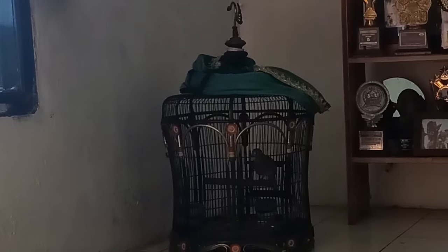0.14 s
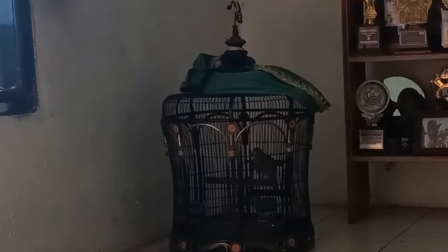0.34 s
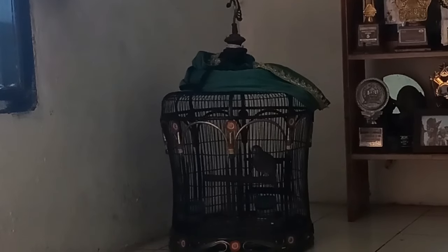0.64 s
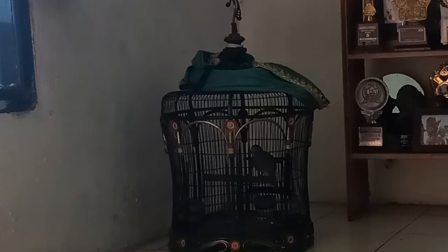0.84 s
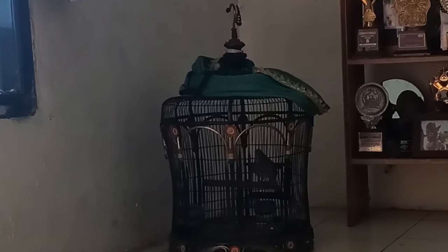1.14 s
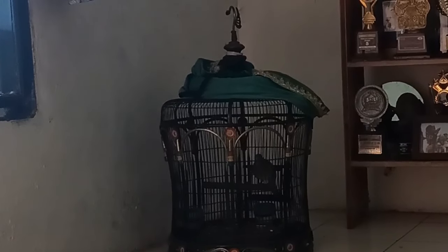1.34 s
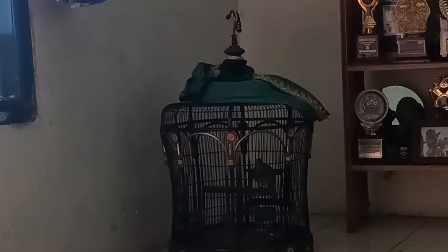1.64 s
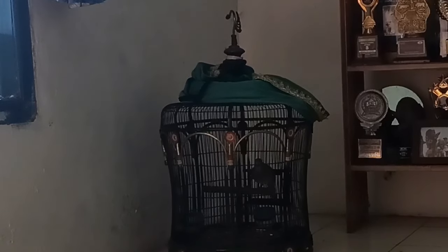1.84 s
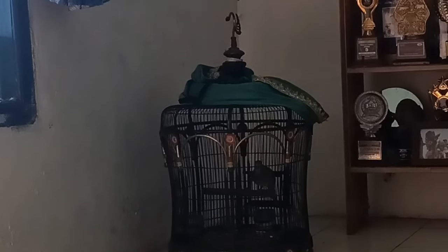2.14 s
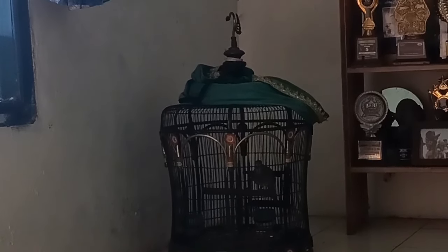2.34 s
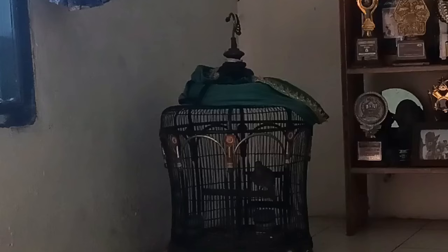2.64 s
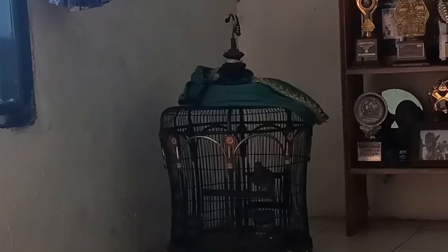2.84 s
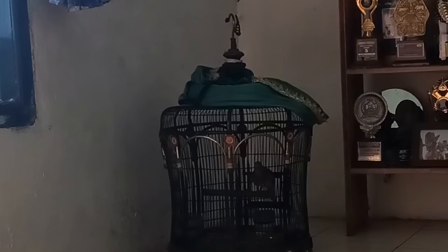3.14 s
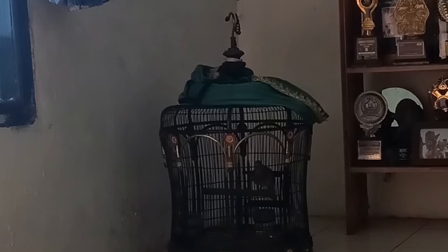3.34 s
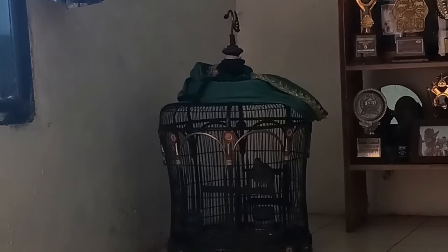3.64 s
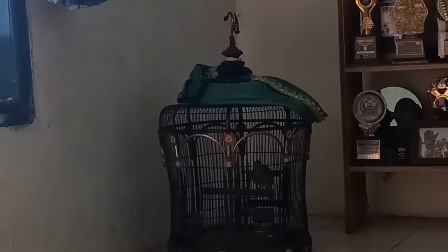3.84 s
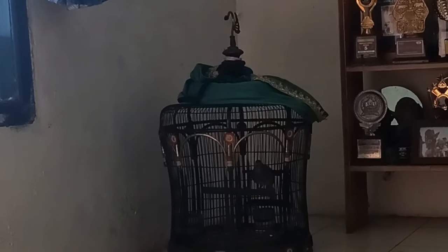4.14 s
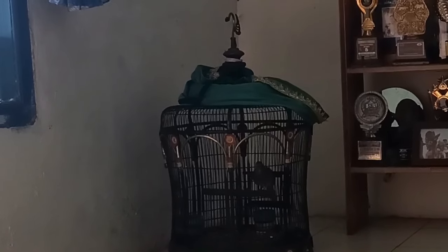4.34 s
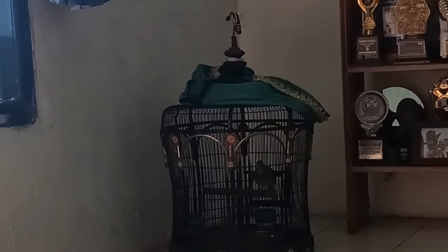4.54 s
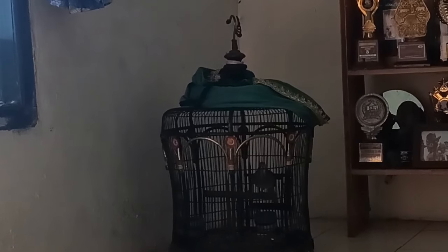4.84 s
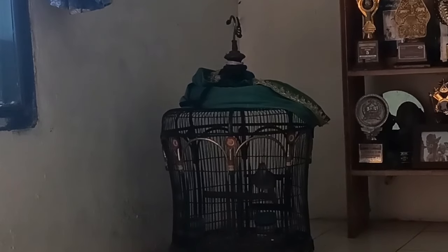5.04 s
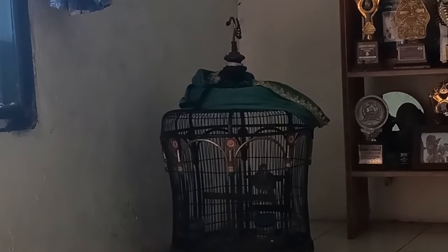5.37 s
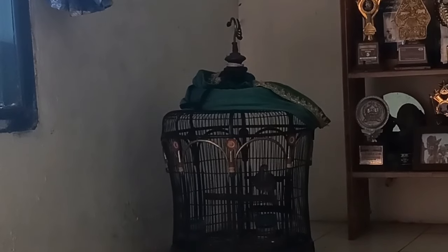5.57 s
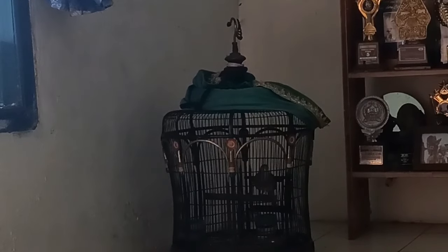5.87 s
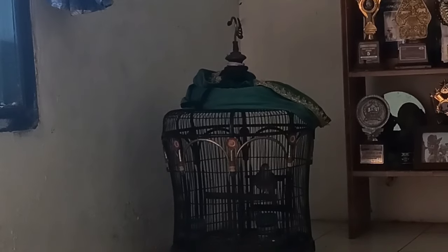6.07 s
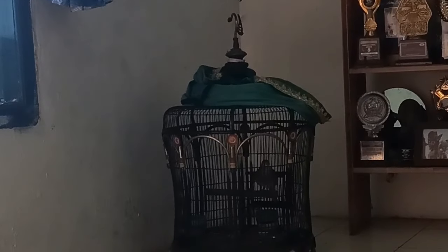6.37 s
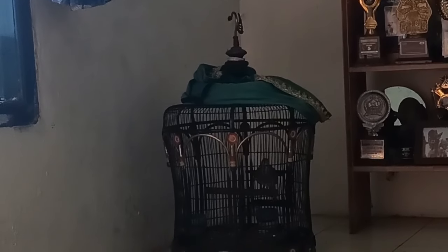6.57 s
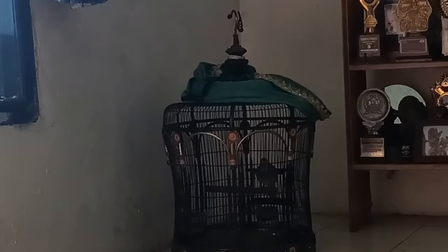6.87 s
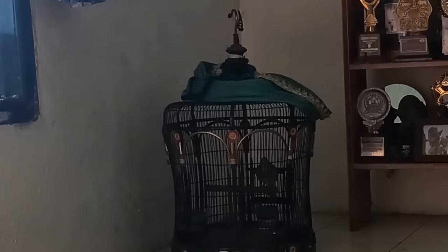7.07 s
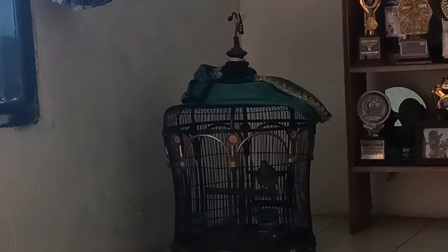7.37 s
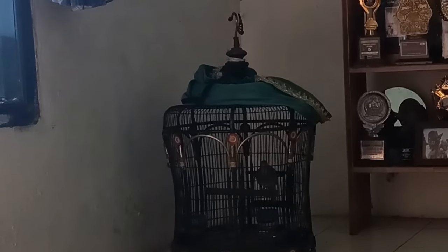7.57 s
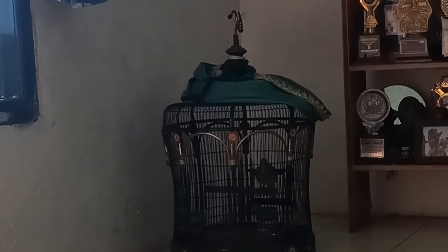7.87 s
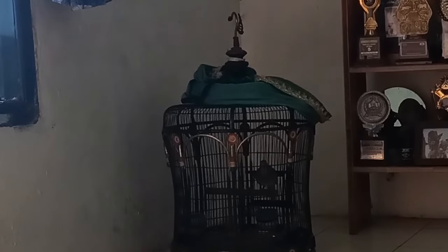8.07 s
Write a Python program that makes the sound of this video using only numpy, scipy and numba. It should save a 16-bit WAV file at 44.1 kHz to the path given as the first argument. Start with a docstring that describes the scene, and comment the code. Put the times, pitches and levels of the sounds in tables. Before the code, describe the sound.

A sharp hissing tick opens over low hum and soft room hiss. A caged dove close to the microphone gives a rolling coo of several quick notes, then repeats it twice after pauses. Faint small birds whistle downward behind it, small ticks scatter throughout, a metal dish scrapes once after the second coo, and a distant hoarse crowing drifts in before the third. Hard-walled room, stereo.

```python
"""A sharp, hissing high tick comes first, over a low hum and faint calls; then a near dove repeats a rolling coo.
The dove is gliding sine tones with throat pulses; small birds are warbled, mostly falling whistles, and the first,
low rising one is a faint far dove. Short ticks and rustles are decaying hiss around a narrow band.
A metal dish scrapes once (rubbed resonances) and a hoarse crowing drifts in (pulses and breath in a throat).
A hard room rings through delay lines. Levels in the tables are those before the final mix."""
import sys
import numpy as np
from scipy import signal
from scipy.fft import rfft, irfft, next_fast_len
from scipy.io import wavfile
from scipy.ndimage import uniform_filter1d
from numba import njit

SR = 44100
rng = np.random.default_rng(int(sys.argv[2]) if len(sys.argv) > 2 else 0)


def to_wav(sig):
    """Store sig (one row per channel, or 1-D mono) as 16-bit WAV at the path in sys.argv[1].

    Samples outside -1..1 are clipped; the rate is SR.
    """
    pcm = np.clip(np.atleast_2d(sig), -1, 1) * 32767
    pcm = np.round(pcm).astype(np.int16)
    wavfile.write(sys.argv[1], SR, pcm.T)  # frames by channels


N = 362061


def undb(db):
    """Decibels to gain."""
    return 10 ** (np.asarray(db) / 20)


def level(x, db):
    """Scale to an rms level in dB."""
    return x * undb(db) / np.sqrt(np.mean(x ** 2))


def band(x, hz, width):
    """Resonance with gain 1 at its centre; hz and width in Hz."""
    return signal.lfilter(*signal.iirpeak(hz, hz / width, fs=SR), x)


def band_twice(x, hz, width, second_width):
    """Two resonances in a row at one pitch, for steeper sides."""
    return band(band(x, hz, width), hz, second_width)


def walk(rate):
    """Smooth random wandering around 0: levels held for 1 / rate seconds, then averaged twice."""
    k = int(SR / rate)
    steps = np.repeat(rng.standard_normal(N // k + 1), k)
    return uniform_filter1d(uniform_filter1d(steps, k), k)[:N]


def colour(x, points):
    """Shape the spectrum of a sound by (frequency [Hz], gain [dB]) points."""
    hz, db = np.transpose(points)
    size = next_fast_len(N)
    bins_hz = np.arange(1, size // 2 + 2) * SR / size
    gain = undb(np.interp(np.log(bins_hz), np.log(hz), db))
    return irfft(rfft(x, size) * gain, size)[:N]


def add(out, start, piece):
    """Mix a piece in at a time in seconds."""
    i = int(start * SR)
    out[i:i + len(piece)] += piece[:N - i]


def turns(hz):
    """Phase in radians of a tone whose pitch in Hz changes from sample to sample."""
    return 2 * np.pi * np.cumsum(hz) / SR


def envelope(rows):
    """Columns of a curve, read at every sample."""
    s, *columns = np.transpose(rows)
    return [np.interp(np.arange(N) / SR, s, c) for c in columns]


# Low background layers: (time [s], thud level [dB], rumble level [dB], drone level [dB])
HUM_LEVELS = [(0.0, -79, -70, -51.5), (0.68, -74, -79, -56.5), (0.84, -60, -63, -47),
              (0.89, -52.5, -71.5, -56.5), (0.98, -68, -68, -45), (1.12, -68, -69, -54),
              (3.08, -77, -63, -60.5), (5.62, -71, -65.5, -68.5), (6.07, -67, -53.5, -65.5),
              (7.17, -66.5, -65.5, -70), (7.49, -57, -52.5, -56), (7.72, -64, -60, -47.5),
              (7.88, -74, -72, -79), (8.2, -75, -88, -61)]
# Swells of the low tone: (middle time [s], spread [s], pitch [Hz], level [dB])
TONE_SWELLS = [(1.08, .1, 195, -58), (5.2, 0.073, 188, -61), (5.77, 0.075, 190, -56.5),
               (6.2, 0.16, 200, -55.5), (6.57, 0.054, 194, -47), (6.88, .07, 194, -42.5),
               (7.72, 0.1, 213, -49), (8.0, .15, 212, -54.5)]
TONE_HZ, TONE_DB = 170, -69  # the low tone between swells
MOTOR_HZ, MOTOR_DB = 484, -68.5


def hum():
    """Low thuds and rumble, a wavering drone, a tone near its octave and a thin motor line."""
    (thud_db, rumble_db, drone_db), t = envelope(HUM_LEVELS), np.arange(N) / SR
    rumble_noise, drone_noise, thud_noise = rng.standard_normal((3, N))
    out = undb(thud_db) * level(band_twice(thud_noise, 30, 12, 23), 0)
    out += undb(rumble_db) * level(band_twice(rumble_noise, 58, 22, 40), 0)
    out += undb(drone_db) * level(band(band(drone_noise, 97, 33), 88, 30), 0)
    drift = turns(1 + 0.015 * walk(4.4))  # phase of a drifting 1 Hz, multiplied up to each pitch
    out += undb(TONE_DB + 4 * walk(5.1)) * np.sin(TONE_HZ * drift)
    for middle, spread, hz, db in TONE_SWELLS:
        out += undb(db) * np.exp(-.5 * ((t - middle) / spread) ** 2) * np.sin(hz * drift)
    motor_hz = MOTOR_HZ * (1 + 0.0054 * walk(10))
    out += undb(MOTOR_DB + 4.0 * walk(7.3)) * np.sin(turns(motor_hz))
    # the two sides differ slightly in level and waver separately
    return out * undb(np.array([[.6], [-.6]]) + 1.2 * np.array([walk(30), walk(20)]))


# Colour of the room tone: (frequency [Hz], relative level per Hz [dB])
AIR_COLOUR = [(25, -14.5), (130, -5.5), (370, -15), (600, -18.5), (1400, -28.5), (3500, -19.5),
              (6500, -29.5), (10000, -21.5), (15500, -27.5)]
# Slow swelling of the room tone: (time [s], level [dB])
AIR_LEVELS = [(0, -55.5), (2.2, -55.5), (3.0, -58.5), (5.8, -57.5), (6.5, -56.5), (7.5, -51), (8.2, -57)]


def air():
    """Room tone: noise largely shared by both sides in the bass, unrelated in the treble."""
    shared, left, right = rng.standard_normal((3, N))
    lowpass = signal.butter(1, 500, fs=SR)
    shared_low, left_low, right_low = signal.lfilter(*lowpass, np.array([shared, left, right]))
    left_air = colour(shared_low + left - .7 * left_low, AIR_COLOUR)
    right_air = colour(shared_low + right - .7 * right_low, AIR_COLOUR)
    swelling = undb(envelope(AIR_LEVELS)[0] + 0.4 * walk(1.3))
    return level(np.array([left_air, right_air]), 0) * swelling


# Far twitter: (time [s], level before a steady 9.5 dB cut [dB])
CHATTER_LEVELS = [(0.0, -45.5), (0.39, -57), (1.39, -47.5), (1.71, -36), (2.05, -56), (2.33, -59),
                  (2.92, -54), (3.72, -69.5), (3.9, -50), (4.34, -63), (4.93, -38), (5.39, -60.5),
                  (6.3, -61), (6.46, -50), (7.47, -47), (8.2, -54.5)]


def chatter():
    """Many faint calls further off: short warbled whistles, most of them falling, blur into a haze."""
    out, warble = np.zeros(N), walk(400)
    for start, pitch, length, fall, size in rng.random((700, 5)):
        t = np.arange(int((0.0086 + .05 * length) * SR)) / SR
        wobble = .03 * warble[int(start * N // 2):][:len(t)]
        hz = 2700 * 2.6 ** pitch * (1 - (.35 * fall - .05) * t / t[-1] + wobble)
        whistle = np.hanning(len(t)) * np.sin(turns(hz))
        add(out, start * N / SR, undb(-8 * size) * whistle)
    return undb(envelope(CHATTER_LEVELS)[0]) * level(out, -9.5)


# Small-bird whistles; the first, low rising row is a faint far dove:
# (start time [s], glide length [s], hold length [s], first pitch [Hz], end pitch [Hz], level [dB])
FAR_WHISTLES = [(0.067, 0.092, 0.14, 875, 1265, -54), (0.284, 0.0096, 0.047, 3370, 3150, -47.5),
                (0.47, 0.044, 0.14, 4210, 3930, -54.5), (1.034, 0.055, .17, 3700, 2760, -37),
                (2.252, 0.22, 0.043, 3950, 2970, -40), (2.44, 0.032, 0.054, 4410, 3910, -55),
                (2.677, 0.042, 0.024, 4550, 4460, -47), (2.82, 0.063, 0.14, 4100, 2806, -35.5),
                (3.40, 0.086, 0.026, 4300, 3020, -55.5), (3.654, .05, 0.03, 4150, 3960, -58),
                (4.336, .077, 0.074, 4090, 3520, -46.5), (4.46, 0.064, 0.03, 3600, 2858, -33.5),
                (4.662, 0.041, 0.049, 4600, 4443, -38.5), (4.705, 0.064, 0.013, 4470, 2840, -33.5),
                (5.19, 0.049, 0.069, 4270, 3675, -54.5), (5.626, .09, 0.02, 3910, 3110, -42.5),
                (5.759, 0.033, 0.03, 4350, 4200, -50), (5.969, 0.037, 0.09, 3960, 3467, -51.5),
                (6.309, .074, 0.062, 4380, 4110, -47), (6.403, 0.038, 0.059, 3500, 3156, -44.5),
                (6.597, 0.034, .09, 3500, 3166, -42.5), (7.362, .049, 0.031, 3270, 2950, -45),
                (8.147, 0.014, 0.042, 4450, 4400, -57)]
SETTLE = .04  # share of the end pitch still lost slowly over the hold
# warble depth, and how much it grows with the speed of the glide (Hz per Hz/s)
WARBLE_HZ, WARBLE_S = 45, .015


def far_whistles():
    """Small birds' warbled, mostly falling whistles and one low rising far dove: each grows, then fades in its hold."""
    out, warble, flutter = np.zeros(N), walk(500), undb(3 * walk(80))
    for start, slide, hold, first_hz, end_hz, db in FAR_WHISTLES:
        length = slide + hold
        t = np.arange(int(length * SR)) / SR
        glide = np.interp(t, [0, slide, length], [first_hz, end_hz * (1 + SETTLE), end_hz])
        depth_hz = WARBLE_HZ + WARBLE_S * abs(first_hz - end_hz) / slide * (t < slide)
        phase = turns(glide + depth_hz * warble[int(start * SR // 2):][:len(t)])
        shape = np.interp(t, [0, .01, slide, slide + 0.68 * hold, t[-1]], [0.05, 0.45, 1, 0.72, 0.19])
        add(out, start, undb(db) * shape * (np.sin(phase) + undb(-32.5) * np.sin(2 * phase)))
    return out * flutter


# Syllables: (start time [s], length [s], first pitch [Hz], end pitch [Hz], starting level [dB])
HOARSE_SYLLABLES = [(6.02, 0.21, 544.2, 559, -51.5), (6.26, 0.29, 740.4, 691.3, -40),
                    (6.53, 0.39, 652.2, 612.3, -39), (7.0, 0.16, 589.5, 586, -41.5)]
# Resonances of its throat: (frequency [Hz], width [Hz], relative level [dB])
HOARSE_RESONANCES = [(680, 240, -4.5), (1084, 100, 5), (1222, 80, -5.5), (1480, 92, -9), (1947, 150, -9),
                     (2900, 2900, -7.5)]
HOARSE_ATTACK_S, HOARSE_RELEASE_S, HOARSE_FADE_DB_S = 0.021, 0.044, -28.5


def hoarse_call():
    """A distant crowing: strong and weak pulses alternate, with breath noise, through the throat."""
    rest_hz = HOARSE_SYLLABLES[0][2]  # pitch between syllables, where nothing is heard
    hz, gain = np.full(N, 1. * rest_hz), np.zeros(N)
    for start, length, first_hz, end_hz, db in HOARSE_SYLLABLES:
        t = np.arange(int(length * SR)) / SR
        add(hz, start, np.interp(t, [0, length], [first_hz, end_hz]) - rest_hz)
        ramps = np.clip(np.minimum(t / HOARSE_ATTACK_S, (length - t) / HOARSE_RELEASE_S), 0, 1)
        add(gain, start, undb(db + HOARSE_FADE_DB_S * t) * ramps)
    cycle = np.floor(np.cumsum(hz * (1 + 0.027 * walk(150))) / SR)
    pulses = np.diff(cycle, prepend=0) * (1 + 0.11 * (-1) ** cycle)
    breath = level(rng.standard_normal(N), -3.0)
    source = level(pulses * undb(7.8 * walk(300)), 0) + breath
    throat = sum(level(band_twice(source, f, w, 2 * w), db) for f, w, db in HOARSE_RESONANCES)
    return gain * level(throat, 0)


# Ringing modes of the metal: (frequency [Hz], width [Hz], relative level [dB])
DISH_MODES = [(1803, 30, -19), (3034, 45, -14.5), (4596, 30, -9.5), (5700, 60, -25.5), (6260, 130, -10),
              (8200, 80, -31), (8800, 70, -16), (10330, 80, -14), (12100, 300, -23.5), (13200, 300, -20.5)]
# Strength of the drag: (time [s], level [dB])
SCRAPE_LEVELS = [(4.87, -51), (4.91, -36.5), (5.0, -31.5), (5.12, -40.5), (5.2, -50.5), (5.26, -87.5)]


def dish():
    """A metal dish dragged briefly: uneven friction keeps its modes ringing."""
    rub = rng.standard_normal(N) * undb(1.3 * walk(60))
    ring = sum(level(band_twice(rub, f, w, 3 * w), db) for f, w, db in DISH_MODES)
    hiss = level(band(rub, 6100, 6000), -13.5)
    started = np.arange(N) > SCRAPE_LEVELS[0][0] * SR
    return undb(envelope(SCRAPE_LEVELS)[0]) * (ring + hiss) * started


# Ticks and rustles: (start time [s], level [dB], low part relative to it [dB], airy part relative to it [dB],
# decay time [s])
TICKS = [(0.0223, -30, -40, -6.5, 0.11), (0.4858, -48.5, -10, -24, 0.037), (0.611, -48, 4.5, -1, 0.017),
         (0.648, -49, -1.5, -25, 0.19), (0.7382, -36.5, -2, -27, 0.016), (0.7664, -40.5, 10, -8.5, 0.046),
         (0.792, -29.5, -2, -3, 0.013), (0.9487, -50.5, 12.5, 5, 0.011), (1.051, -43, -10, 3, 0.093),
         (1.1694, -41, 3, -5.5, 0.018), (1.2268, -27.5, -13, -13, 0.027), (1.303, -44.5, 6, -16, 0.018),
         (1.5426, -40, -9, -8, 0.021), (1.638, -34.5, 0.3, -15, 0.038), (1.7408, -38.5, -1.5, -33, .045),
         (1.949, -47, 0.5, -0.5, 0.075), (2.0516, -53, 1.5, -1, 0.037), (2.16, -52.5, 1.5, -3, 0.12),
         (2.3042, -50, -26, -21.5, 0.071), (2.4294, -51.5, -11, -4.5, 0.1), (2.5475, -50.5, -19, -3, 0.017),
         (2.7392, -42, 3, -37, 0.029), (3.1218, -52, 0.5, 6, 0.042), (3.464, -66.5, 13.5, -7, 0.03),
         (4.4284, -35.5, -6, -4.5, 0.032), (4.7035, -51.5, -2, -11, .051), (4.7411, -38, -5.5, -29, 0.041),
         (5.2265, -43.5, -9, -4, 0.022), (5.535, -54.5, -5, -10.5, 0.025), (5.7384, -46.5, 5, -25.5, 0.056),
         (5.774, -42, -4, -15, 0.091), (5.7996, -30, -6, -17.5, 0.0067), (5.997, -36, -33, -5, 0.012),
         (6.056, -42, -3, 4, 0.018), (6.246, -42.5, -0.5, -5.5, 0.039), (6.5156, -42, 1, -0.5, .014),
         (6.6686, -31, -7, -11, 0.027), (6.738, -34.5, 0.5, -38, .027), (7.3312, -44, 8.5, 11.5, 0.026),
         (7.7034, -56, 9.5, 7, 0.057), (7.7297, -36.5, -0.5, -16, 0.037), (7.9538, -28, -52, -15, 0.017)]
TICK_RISE_S = .0035
TICK_HZ, TICK_SPREAD_HZ = 6486, 400  # the ticks centre near this pitch; each is shifted by a random amount


def ticks_and_rustles():
    """Short sharp "tsip" ticks of small birds and rustles: hiss around a narrow band near 6.5 kHz."""
    out, t = np.zeros(N), np.arange(SR // 4) / SR
    noise = rng.standard_normal((3, N + len(t)))
    uneven = undb(1.7 * walk(120) + 6.1 * walk(600))
    centres = TICK_HZ + TICK_SPREAD_HZ * rng.standard_normal(len(TICKS))
    for (start, db, low_db, air_db, decay), centre_hz in zip(TICKS, centres):
        mid, low, high = noise[:, int(start * SR):int(start * SR) + len(t)]
        hiss = level(band(mid, 7500, 3600), -10.5)
        hiss += level(band_twice(mid, centre_hz, 550, 900), -7.5)  # narrow band of the tick
        hiss += level(band(low, 3900, 3500), low_db)
        hiss += level(band_twice(low, 1300, 810, 810), low_db - 16.5)
        hiss += level(band_twice(high, 12000, 7000, 7000), air_db)
        shape = (1 - np.exp(-t / TICK_RISE_S)) * np.exp(-t / max(decay, .002))
        add(out, start, undb(db) * shape * hiss)
    return out * uneven


# Dove notes: (start time [s], croak length [s], hold length [s], fall length [s], tone pitch [Hz],
# tone level [dB], level change over the fall [dB])
DOVE_NOTES = [(1.341, .05, 0.053, 0.11, 1271, -9, -3), (1.578, .023, 0.011, 0.03, 1162, -14, -17.5),
              (1.665, 0.026, 0.011, 0.033, 1184, -13, -8.5), (1.768, 0.028, 0.041, 0.064, 1194, -11, -8.5),
              (3.692, .05, 0.043, 0.1, 1272, -8, -4), (3.913, 0.022, 0.021, 0.028, 1173, -16, -9),
              (3.98, .027, 0.03, 0.028, 1160, -14, -9), (4.084, 0.015, 0.032, 0.045, 1188, -11.5, -11.5),
              (4.205, 0.028, 0.051, 0.058, 1202, -12.5, -10.5),
              (6.835, 0.048, 0.055, 0.099, 1275, -8.5, -1.5), (7.045, .051, 0.024, 0.015, 1165, -16, -1),
              (7.146, .019, 0.01, 0.035, 1167, -12, -10), (7.185, 0.0087, 0.05, 0.0082, 1315, -17.5, 3.5),
              (7.25, .019, 0.049, .069, 1203, -9.5, -12.5), (7.409, 0.017, .041, .044, 1122, -26, 2.5),
              (7.528, .032, 0.028, 0.0836, 1227, -18.5, -4)]
# Overtones of the dove: (multiple of the pitch [-], mean level [dB])
DOVE_OVERTONES = [(2, -34.5), (3, -36), (4, -40), (5, -33), (6, -28), (7, -38), (8, -46.5)]
DOVE_THROAT_HZ, DOVE_THROAT_WIDTH_HZ = 1136, 490
# the croak slides up to the break; its level is relative to the tone
CROAK_FROM_HZ, CROAK_BREAK_HZ, CROAK_DB = 805, 1018.7, -3
SAG = .05  # share of the pitch lost over the fall
ROLL_HZ, ROLL_DEPTH = 53.4, .8  # dips per second, and how much of the tone each one takes away


def dove():
    """Each note opens with a croak of throat pulses, breaks to a pure tone behind the closed beak, holds and sags."""
    voice, edge_tones, waver, husk = np.zeros(N), np.zeros(N), walk(60), walk(300)
    breath = np.zeros(N)  # air hisses through the beak during the croak
    leak = [undb(db + 3 * walk(60)) for _, db in DOVE_OVERTONES]
    for start, slide, hold, fall, top_hz, top_db, fade_db in DOVE_NOTES:
        croak_db = top_db + CROAK_DB
        t = np.arange(int((slide + hold + fall + 0.044) * SR)) / SR
        now = slice(int(start * SR), int(start * SR) + len(t))
        # croak: one puff every fourth cycle spreads side lines around the sliding pitch
        croak_hz = np.interp(t, [0, .5 * slide], [CROAK_FROM_HZ, CROAK_BREAK_HZ])
        croak_phase = turns(croak_hz * (1 + .07 * husk[now]))
        puff_depth = np.interp(t, [0, slide], [1.5, .3])
        puffs = 1 + puff_depth * np.cos(croak_phase / 4 + 2.1 * husk[now])
        swell_times = [0, slide - .004, slide, slide + 0.013, slide + .04]
        swell_db = croak_db + np.array([-20, -6, 0, 0, -27])
        croak = undb(np.interp(t, swell_times, swell_db)) * np.minimum(t / 0.0024, 1) * puffs
        # tone: a quick step up, a hold, then the sag
        knots = slide + np.cumsum([0, .008, hold, fall])
        tone_hz = np.interp(t, knots, [.985 * top_hz, top_hz, top_hz, top_hz * (1 - SAG)])
        tone_phase = turns(tone_hz * (1 + 0.0052 * waver[now]))
        ramps = np.clip(np.minimum((t - slide) / 0.0051, (t[-1] - t) / 0.0033), 0, 1)
        tone = undb(np.interp(t, knots, [top_db, top_db, top_db, top_db + fade_db])) * ramps
        # the sagging end rolls: the throat opens and shuts
        since_hold = t - knots[2]
        rolling = ROLL_DEPTH * np.clip(since_hold / 0.022, 0, 1)
        tone = tone * (1 - rolling * np.sin(np.pi * ROLL_HZ * since_hold + 0.17 * waver[now]) ** 2)
        add(voice, start, np.sqrt(2) * (croak * np.sin(croak_phase) + tone * np.sin(tone_phase)))
        for (k, _), gain in zip(DOVE_OVERTONES, leak):
            overtone = undb(6.5) * croak * np.sin(k * croak_phase) + tone * np.sin(k * tone_phase)
            add(edge_tones, start, gain[now] * overtone)
        add(breath, start, croak)
    edge_tones += undb(-26.5) * breath * level(band(rng.standard_normal(N), 8100, 6400), 0)
    voice = band_twice(voice, DOVE_THROAT_HZ, DOVE_THROAT_WIDTH_HZ, DOVE_THROAT_WIDTH_HZ)
    return voice, edge_tones


PORT_LAG = 12  # samples by which the left microphone port hears the treble sounds earlier


def scatter(x):
    """Floor, shelves and bars scatter the treble sounds, differently for each port."""
    t = np.arange(SR // 25) / SR
    echoes = rng.standard_normal((2, len(t))) * np.exp(-t / .008)
    echoes = echoes / np.sqrt(np.sum(echoes ** 2, axis=1, keepdims=True))
    direct = undb(-9) * np.array([np.roll(x, -PORT_LAG), x])
    return signal.fftconvolve(x[None], echoes, axes=1)[:, :N] + direct


# Travel times between the walls: one column, (delay [samples])
ROOM_LAGS = np.array([431, 557, 683, 829, 977, 1129, 1301, 1481, 1669, 1867, 2083, 2309, 2551, 2803, 3079, 3371])
ROOM_T60_S, ROOM_DAMP = 0.44, 0.44  # bass decay time over 60 dB; dulling per round, 0 to 1


@njit
def walls(x, lags, gain, damp):
    """Sixteen delay lines that feed each other, duller on every round."""
    line, soft, out = np.zeros((16, 4096)), np.zeros(16), np.zeros((2, len(x)))
    for i in range(len(x)):
        total = 0.
        for k in range(16):
            soft[k] += (1 - damp) * (gain[k] * line[k, (i - lags[k]) & 4095] - soft[k])
            total += soft[k]
            out[k % 2, i] += soft[k] * (1 - (k & 2))  # lines alternate sides, with mixed signs
        for k in range(16):
            line[k, i & 4095] = x[i] + soft[k] - total / 8
    return out


DOVE_PAN_DB = 2.5  # left minus right


def scene():
    """The near dove's voice arrives directly; the other calls, ticks and scrape are scattered; all ring in the room."""
    (voice, edge_tones), ticks = dove(), ticks_and_rustles()
    far = far_whistles() + chatter() + dish() + hoarse_call()
    to_walls = undb(-11.0) * voice + undb(-10.0) * edge_tones + undb(-11.5) * ticks + undb(-2.5) * far
    lag_gains = undb(-60 * ROOM_LAGS / SR / ROOM_T60_S)
    wet = walls(to_walls + 1e-18, ROOM_LAGS, lag_gains, ROOM_DAMP)
    scattered = scatter(undb(-0.5) * ticks + undb(-2) * far + undb(-4) * edge_tones)
    near = undb(-2.0 + DOVE_PAN_DB * np.array([[.5], [-.5]])) * voice
    return near + scattered + wet + hum() + air()


# Colour of the left microphone port: (frequency [Hz], gain [dB])
LEFT_COLOUR = [(100, 0.5), (1500, 2), (2600, 2), (4000, -0.5), (5600, -4.5), (6700, -13), (7900, -9),
               (9200, 2.5), (10600, -0.5), (12500, -2.5), (13400, -8), (14200, -19), (15500, -38.5)]
# Colour of the right microphone port: (frequency [Hz], gain [dB])
RIGHT_COLOUR = [(100, -0.5), (1500, 6), (2600, 5.5), (4000, 9.5), (5400, 8.5), (6200, 17), (7600, 17.5),
                (8100, 6.5), (10200, -8), (12200, 5), (13300, -1.5), (15000, 8.5)]
TOP_HZ = 15550  # the treble is cut above this


def record(dry):
    """Each port has its own colour; peaks beyond 0.98 clip; a steep filter cuts the top."""
    ports = np.array([colour(dry[0], LEFT_COLOUR), colour(dry[1], RIGHT_COLOUR)])
    top_cut = signal.ellip(12, .2, 60, TOP_HZ, fs=SR, output="sos")
    return signal.sosfilt(top_cut, np.clip(ports, -.98, .98))


dry = scene()
out = record(dry)
to_wav(out)
```